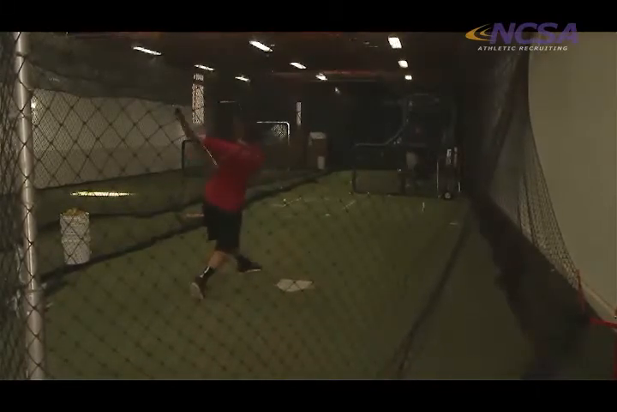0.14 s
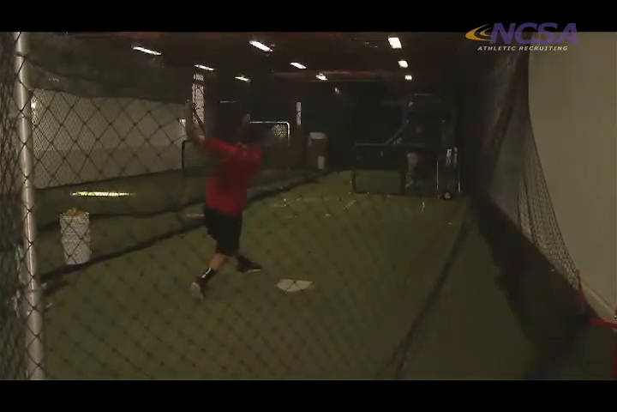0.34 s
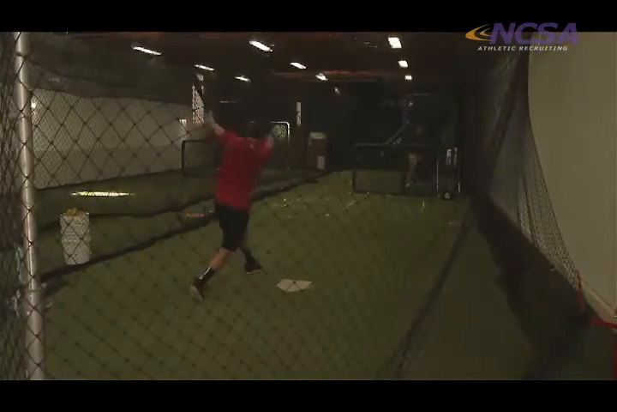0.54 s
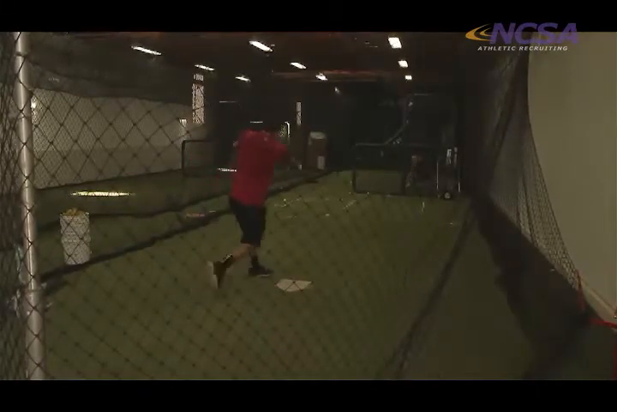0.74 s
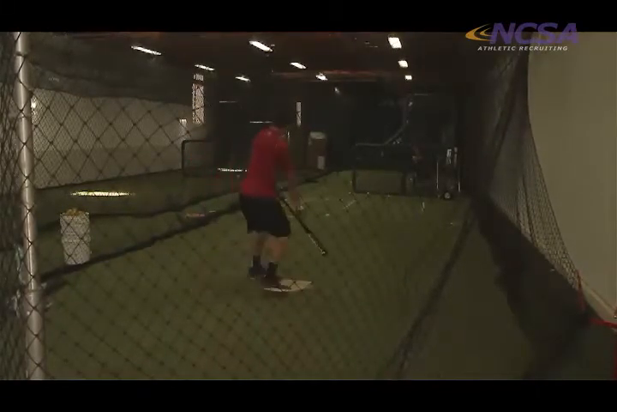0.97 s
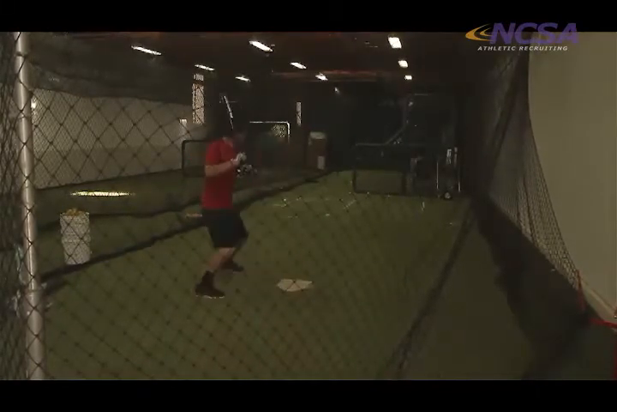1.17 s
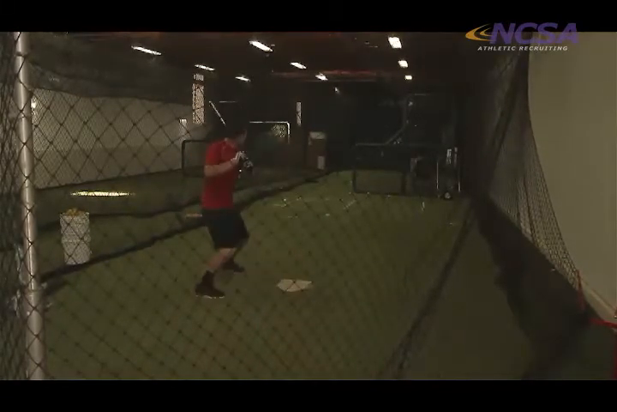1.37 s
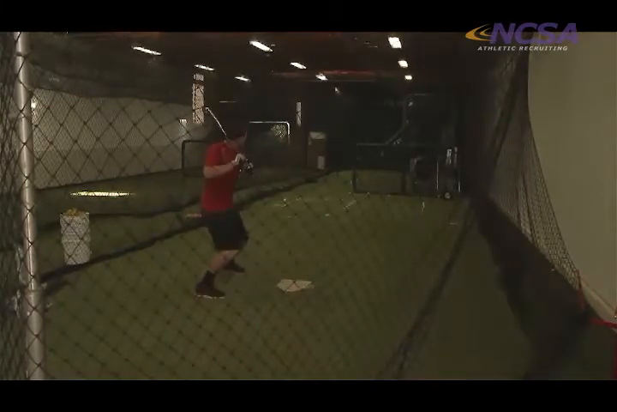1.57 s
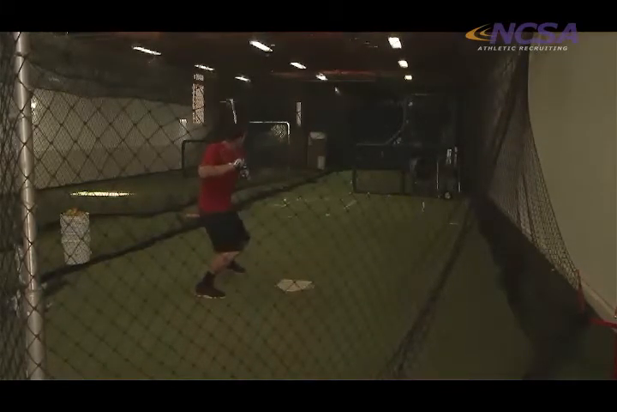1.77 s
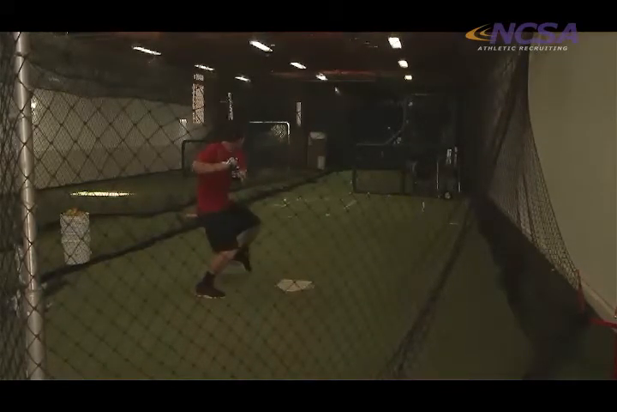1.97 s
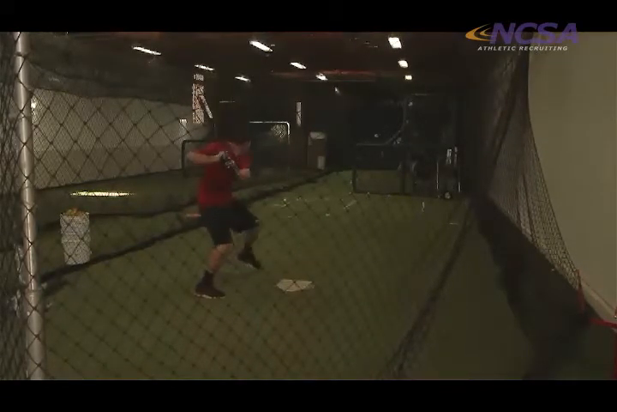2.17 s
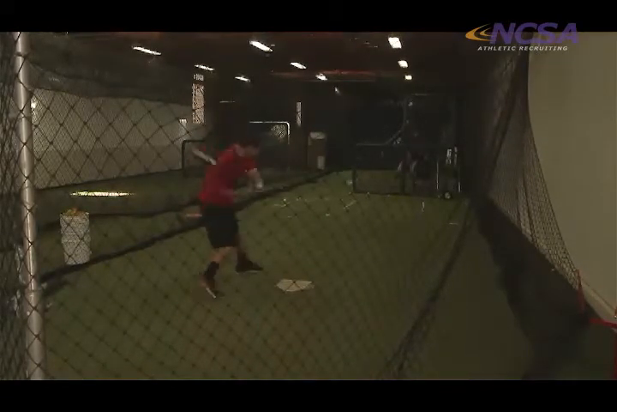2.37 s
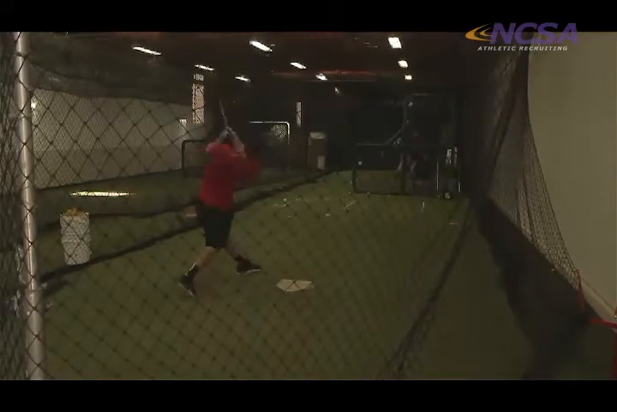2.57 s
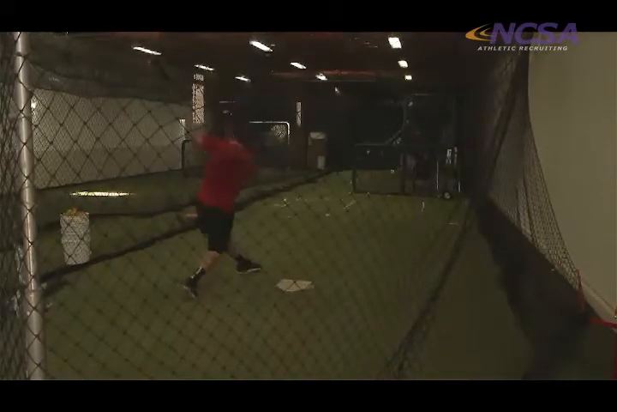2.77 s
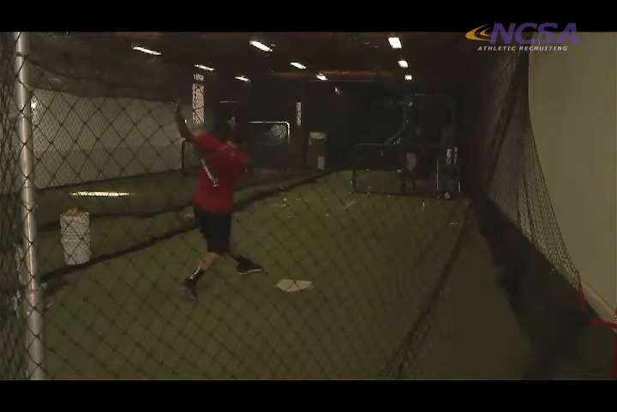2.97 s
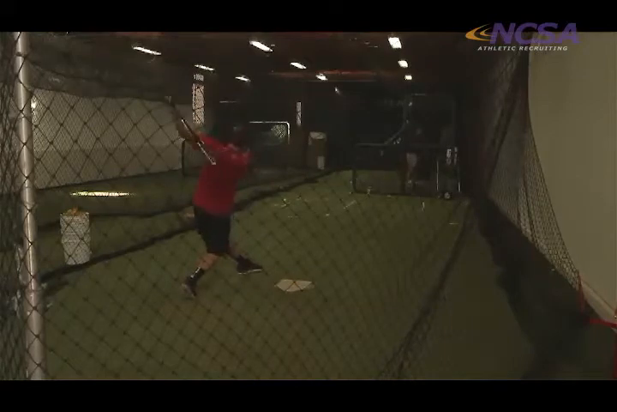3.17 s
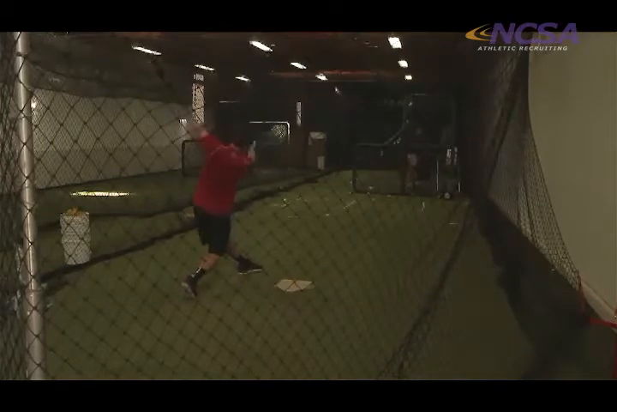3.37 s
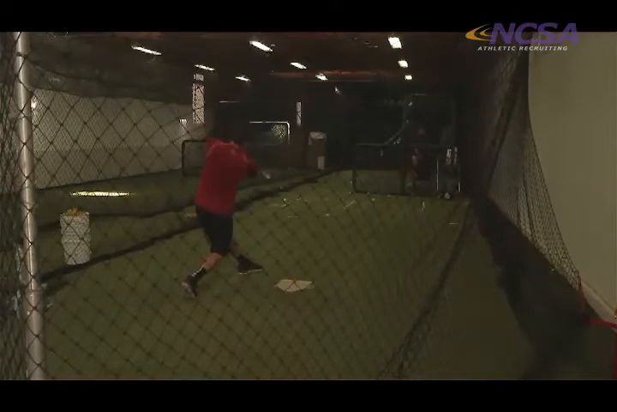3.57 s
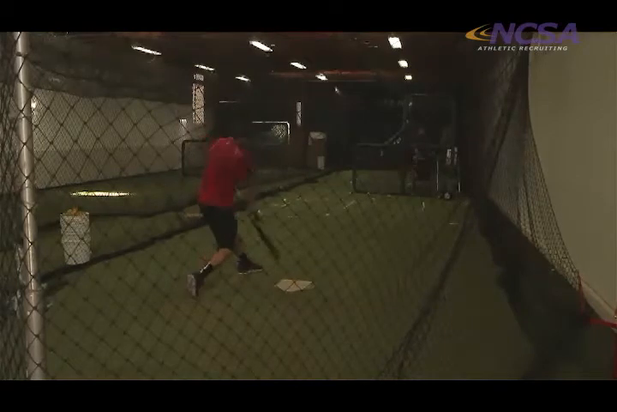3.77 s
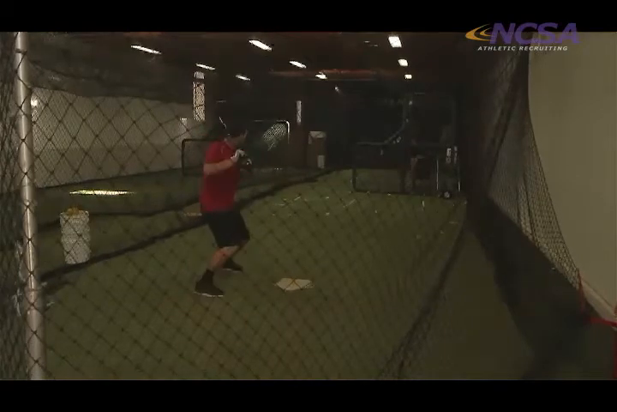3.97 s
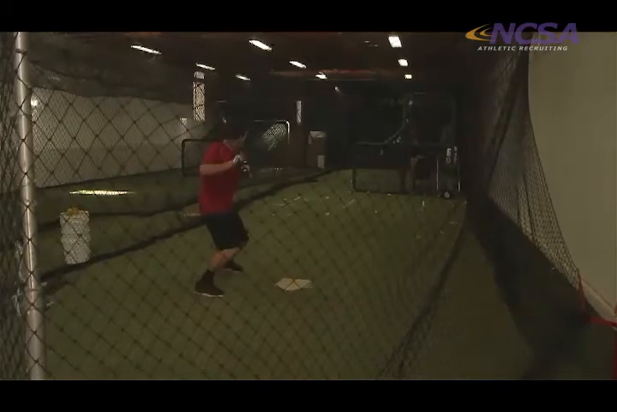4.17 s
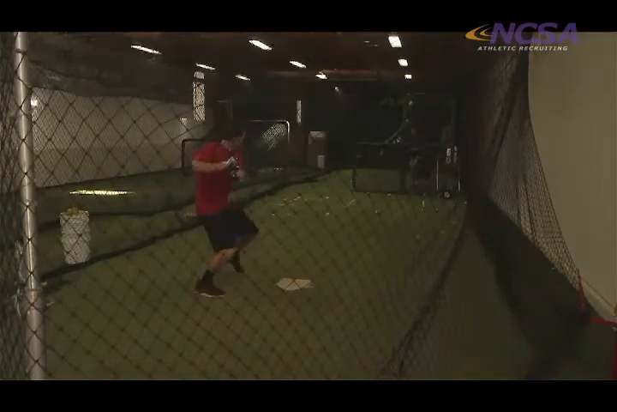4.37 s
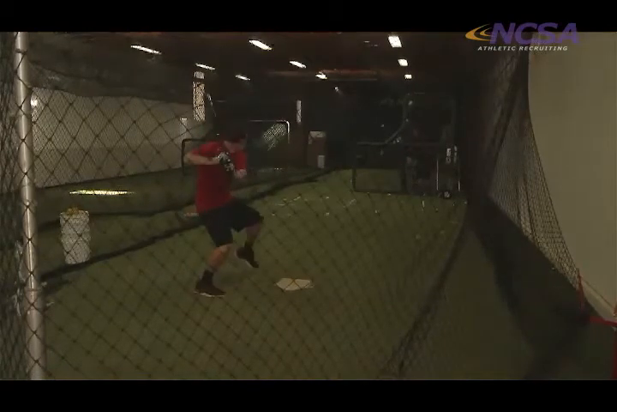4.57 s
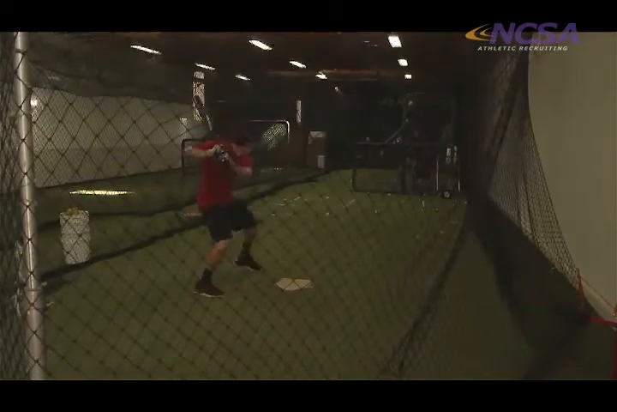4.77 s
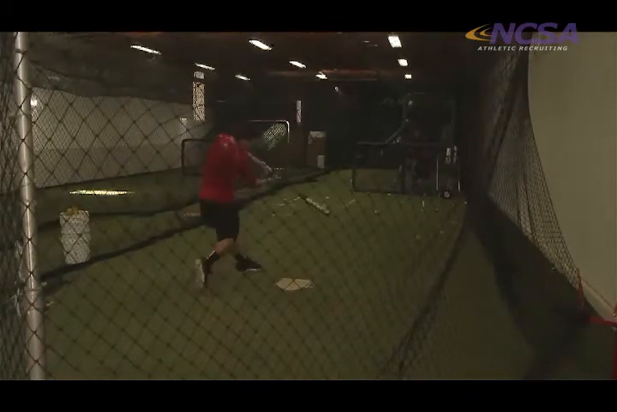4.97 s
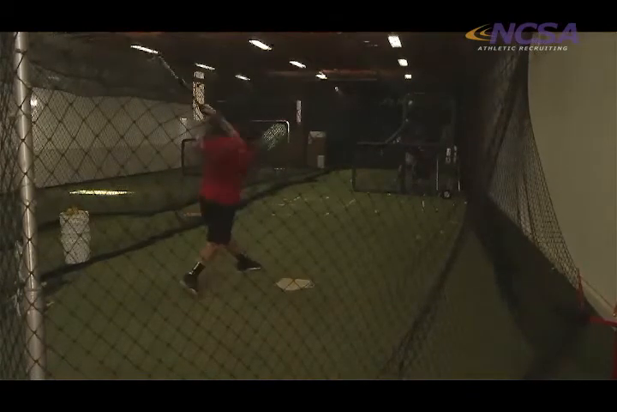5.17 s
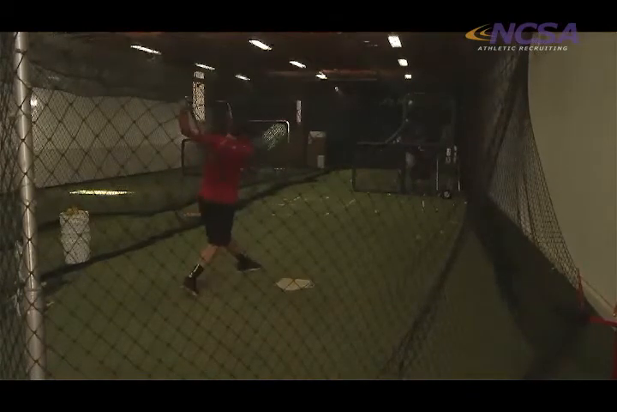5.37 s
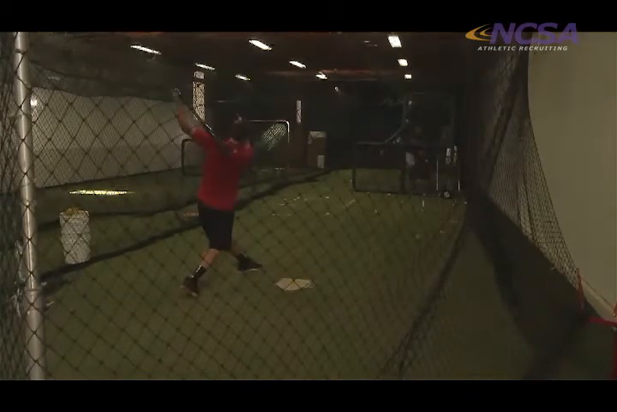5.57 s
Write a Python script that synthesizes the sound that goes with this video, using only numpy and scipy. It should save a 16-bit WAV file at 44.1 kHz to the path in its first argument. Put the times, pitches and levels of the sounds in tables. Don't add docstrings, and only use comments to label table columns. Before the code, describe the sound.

In a long, hard indoor batting cage, the fluttering ring of an earlier hit fades and a ball slams the backstop. After a cut and faint scuffs, a metal bat swishes and cracks a ball, overloading a nearby camcorder microphone. Echoes bounce between end walls amid net rattles and thuds. Another cut brings a second loud ping, cut off while ringing. Ventilation, motor hum and hiss continue, dipping after blows.

```python
import sys
import numpy as np
from scipy import signal
from scipy.fft import rfft, irfft
from scipy.io import wavfile
from scipy.ndimage import uniform_filter1d

SR = 44100
rng = np.random.default_rng(int(sys.argv[2]) if len(sys.argv) > 2 else 0)


def undo_db(level):
    steps = np.asarray(level, float) / 20
    return 10 ** steps


def materialize(psi):
    bounded = np.clip(np.atleast_2d(psi).T, -1, 1)
    quanta = np.round(bounded * 32767).astype(np.int16)
    wavfile.write(sys.argv[1], SR, quanta)


N = 248724
T = np.arange(N) / SR

BLOW_S = [2.5102, 5.0172]
RING_START_S = [-.2125, 2.5102, 5.0172]
SHOT_END_S = [1.2245, 3.8937, 5.64]
# frequency in Hz, density in dB per Hz.
CRACK = [(180, -58), (300, -32.5), (422, -13.5), (1030, 1), (1980, -1), (2670, 9), (3650, -1),
         (4240, -39.5), (5540, -41), (8530, -28), (10500, -47), (13600, -82.5), (22000, -120)]
# frequency in Hz, density in dB per Hz.
VENTILATION = [(12, -60), (20, -4), (92, -8), (130, -8.5), (266, -12), (376, -18), (403, -15), (532, -18.5),
               (806, -14.5), (1280, -20.5), (2330, -32), (2810, -31), (5000, -44.5), (6500, -66.5),
               (11000, -120)]
# frequency in Hz, density in dB per Hz.
HISS = [(1000, -12.5), (4000, 0), (8000, -2), (10500, -3)]


def unit(x):
    return x / np.sqrt(np.mean(x ** 2))


def colour(x, points):
    hz, db = np.transpose(points)
    bins_hz = np.arange(len(x) // 2 + 1) * SR / len(x)
    curve_db = np.interp(np.log(bins_hz + 1), np.log(hz), db)
    return irfft(rfft(x) * undo_db(curve_db), len(x))


def mode(x, hz, width):
    return signal.lfilter(*signal.iirpeak(hz, hz / max(width, 3.), fs=SR), x)


def walk(rate):
    k = int(SR / rate)
    held = np.repeat(rng.standard_normal(N // k + 1), k)
    return 0.98 * uniform_filter1d(held, k)[:N]


def add(out, s, x):
    i = int(s * SR)
    out[i:i + len(x)] += x[:len(out) - i]


def since(s):
    return np.clip(T - s, 0, None)


def blows():
    # strength in dB, crack in dB, floor bounce delay in seconds, bounce in dB, gain pull-down in dB.
    strikes = [
        (10, -0.5, .0053, -0.5, -10.5),
        (10, -1.5, .0045, -14.5, -17.5),
    ]
    # frequency in Hz, level in dB, T60 in seconds.
    pings = [
        [(2448, -3.5, 0.027), (2600, -23, 0.027), (2757, -2.5, 0.018), (2415, -25.5, 0.033),
         (3330, -21.5, 0.11)],
        [(2348, -0.5, 0.085), (2848, -1.5, 0.039), (2556, -1.5, 0.012), (3537, -13, 0.27), (2190, -15.5, 0.033)],
    ]
    contact_s, pull_down_s = 0.0005, 0.0068
    out, t = np.zeros(N), T[:SR // 5]
    push = np.sin(np.pi * np.clip(t / contact_s, 0, 1))
    late = np.clip(t - contact_s, 0, 1)
    for s, tones, (db, crack_db, bounce_s, bounce_db, pull_db) in zip(BLOW_S, pings, strikes):
        ring = 0
        for hz, tone_db, t60 in tones:
            ring = ring - undo_db(tone_db) * np.sin(2 * np.pi * hz * late) * 1000 ** (-late / t60)
        noise = rng.standard_normal(len(t))
        crack = mode(mode(noise, 1300, 2500), 1300, 5000) * np.exp(-t / 0.0055)
        crack += undo_db(-17) * mode(noise, 6500, 5000) * np.exp(-t / 0.0026)
        ping = push + undo_db(crack_db) * crack + ring
        add(ping, bounce_s, undo_db(bounce_db) * ping[:-int(bounce_s * SR)])
        pull = np.clip((t - pull_down_s) / 0.0007, 0, 1)
        add(out, s, undo_db(db + pull_db * pull) * ping)
    return out


def echo(hz, other_hz, crack_db, smear_s, width_hz):
    t = T[:SR // 12]
    burst = rng.standard_normal(len(t)) * np.exp(-t / smear_s)
    tone = 0
    for f, share in ((hz, 1), (other_hz, 0.6), (3020, 0.45)):
        tone = tone + share * mode(mode(mode(burst, f, 110.), f, 600.), f, 900.)
    front = burst * np.exp(-t / 0.004) + 6 * (t == t[8])
    crack = mode(np.roll(colour(np.roll(front, 100), CRACK), -100), 1300, width_hz)
    sound = tone / np.abs(tone).max() + undo_db(crack_db) * crack / np.abs(crack).max()
    sound = sound * np.clip(t / 0.0002, 0, 1)
    sound = sound * np.clip((t[-1] - t) / 0.03 - 0.3, 0, 1)
    return sound / np.abs(sound).max()


def absorb(x, start_s):
    loss_db_per_s = 33.5
    hz, s, frames = signal.stft(x, SR, nperseg=256)
    loss_db = loss_db_per_s * (hz[:, None] / 8000) ** 2 * np.clip(s - start_s, 0, 1)
    return signal.istft(frames * undo_db(-loss_db), SR, nperseg=256)[1][:N]


def hall():
    # frequency in Hz, width in Hz, level in dB in swings one, two and three.
    barrel_modes = [(2360, 86, -25, 4, -22), (2344, 10, -12, 2, 15), (2395, 22, -5, 5, -2),
                    (2605, 14, -4, 11, -14), (2860, 5.7, -2, -23.5, 10.5), (3090, 7, -17.5, -14, -18.5),
                    (3030, 28, -4.5, -2.5, 9), (3280, 63, -19, -11, -33), (3750, 39, -11, -44.5, 3),
                    (3420, 86, -25.5, -2, -14), (3640, 29, -14, -8, -20), (3840, 110, -19, -15, -3),
                    (3860, 63, -12, -16.5, 1.5), (3537, 120, -4.5, -12.5, 4)]
    # level in dB, crack against the barrel tones in dB.
    rings = [
        (-31.5, -1),
        (-33, -1),
        (-31, -1.5),
    ]
    sheens_db = [-13, -13.5, -16]
    # delay in seconds, peak in dB.
    flutter = [(.1025, -9.5), (0.1816, -14.5), (0.262, -15), (0.3351, -17.5), (0.4036, -14.5)]
    flutter_trim_db = [-1.5, -1, 0.5]
    snaps_db = [-34, -60]
    loud_tones_hz = [(2600, 3600), (2605, 2395), (2780, 3560)]
    # delay in seconds, peak in dB, smear in seconds.
    clumps = [(.014, -10.5, 0.0058), (.033, -15, 0.023), (.053, -21, 0.0081), (.116, -15, 0.0088),
              (.152, -19.5, 0.019), (.194, -50, 0.0029), (.288, -43, 0.0077), (.312, -18.5, 0.0024),
              (.344, -26, 0.0036), (.438, -26, 0.01), (.453, -18, 0.023), (.48, -21, 0.0063),
              (.52, -31, 0.0033), (.584, -25, 0.0081)]
    # time in seconds, peak in dB, Hz, smear in seconds.
    strays = [
        [(.0478, -13.5, 2600, 0.0032), (.1314, -27, 3340, 0.0054), (.2418, -21, 2730, 0.0042),
         (.3386, -24, 2680, 0.0039)],
        [(2.5555, -8.5, 2430, 0.0034), (2.7666, -23.5, 3000, 0.0082)],
        [(5.0324, -19, 2910, 0.0066), (5.0494, -17, 2880, 0.041), (5.0694, -13, 3590, 0.01),
         (5.0844, -21.5, 3350, 0.0089), (5.2114, -16, 3550, 0.007)],
    ]
    build_s, hold_s, swell_db_s, fall_db_s = 0.0051, 0.47, 7, 46.5
    sheen_curve = [(3300, -30), (4050, 7), (5000, 4.5), (6500, -3.5), (10500, -15.5)]
    wall_limit = signal.cheby1(6, 1, 3960, fs=SR, output="sos")
    out = np.zeros(N)
    for swing, ((db, crack_db), start_s, end_s) in enumerate(zip(rings, RING_START_S, SHOT_END_S)):
        arrivals = rng.standard_normal(N) * undo_db(1.5 * walk(150))
        barrel = unit(sum(undo_db(row[2 + swing]) * mode(arrivals, row[0], row[1]) for row in barrel_modes))
        barrel = signal.sosfilt(wall_limit, barrel)
        sheen = undo_db(sheens_db[swing]) * unit(colour(arrivals, sheen_curve))
        crack = undo_db(crack_db) * unit(colour(arrivals, CRACK))
        fall_db = fall_db_s * since(start_s + hold_s) - swell_db_s * since(start_s)
        shape = (1 - np.exp(-since(start_s) / build_s)) * undo_db(db - fall_db) * (T < end_s)
        heard = shape * (barrel + sheen + crack)

        tones = loud_tones_hz[swing]
        returns = []  # time, peak dB, then what echo() takes
        for k, (s, peak_db) in enumerate(flutter):
            pair = tones[k % 2], tones[1 - k % 2]
            returns.append((start_s + s, peak_db + flutter_trim_db[swing], *pair, 2, 0.004, 9000.))
        for k, (s, peak_db, smear_s) in enumerate(clumps):
            pair = tones[k % 2], tones[1 - k % 2]
            returns.append((start_s + s, peak_db, *pair, -5, smear_s, 4000.))
        for s, peak_db, hz, smear_s in strays[swing]:
            returns.append((s, peak_db, hz, tones[0], -3, smear_s, 6000.))
        for s, peak_db, *look in returns:
            if 0 <= s < end_s:
                add(heard, s, undo_db(peak_db + 2) * echo(*look))

        for (delay_s, _), snap_db in zip(flutter, snaps_db):
            s = start_s + delay_s
            heard += (T >= s) * undo_db(snap_db) * np.exp(-since(s) / 0.0032) * mode(arrivals, 5600, 7000)
        out += absorb(heard, start_s)
    return out


def thuds():
    # start in seconds, peak in dB, body in Hz, knock in Hz, knock against body in dB.
    soft_blows = [(0.041, -31.5, 297, 960, -21), (0.241, -37, 107, 677, 9.5), (0.834, -31.5, 104, 437, -28),
                  (2.254, -27.5, 206, 400, -1), (2.762, -31, 185, 914, 1), (2.82, -33, 183, 570, 8.5),
                  (2.998, -32.5, 210, 877, 5.5), (3.153, -17, 221, 364, -1), (3.623, -29, 135, 363, -4),
                  (4.357, -35, 214, 755, -13), (4.805, -29, 185, 473, -2), (4.977, -20.5, 201, 447, -14),
                  (5.445, -27, 186, 890, 0.5)]
    slams = [
        (.7676, -9, 275, 1400, -10),
        (.803, -21, 250, 430, -18),
        (5.2585, -19, 175, 900, 1),
    ]
    events = [(*row, 5.77) for row in soft_blows] + [(*row, 5.76) for row in slams]
    out, t = np.zeros(N), T[:SR]
    rise = (1 - np.exp(-t / 0.0011)) ** 2
    for s, db, hz, knock_hz, knock_db, cycles in events:
        t60 = cycles / hz
        body = -np.sin(2 * np.pi * hz * t) * 1000 ** (-t / t60)
        sag_hz = hz + (knock_hz - hz) * np.exp(-t / 0.013)
        knock = -np.sin(2 * np.pi * np.cumsum(sag_hz) / SR) * 1000 ** (-1.2 * t / t60)
        tick = mode(mode(rng.standard_normal(SR), 1200, 1200), 1200, 1800) * np.exp(-t / 0.0021)
        tail = unit(mode(mode(rng.standard_normal(SR), 0.94 * hz, 0.2 * hz), hz, 3 * hz))
        tail *= (1 - np.exp(-t / 0.011)) * 1000 ** (-t / 0.48)
        thud = body + undo_db(knock_db) * (knock + tick) + undo_db(-22.5) * tail
        add(out, s, undo_db(db + 4.5) * rise * thud)
    return out


def netting():
    # start in seconds, rumble in dB, rustle in dB.
    shakes = [
        (.042, -36.5, -55),
        (2.765, -39, -56),
        (5.256, -43.5, -53.5),
    ]
    # start in seconds, peak in dB.
    clicks = [(0.0994, -31), (0.1183, -23.5), (2.823, -31), (2.9774, -36.5), (5.14, -30.5), (5.2244, -46)]
    rumble_t60_s, rustle_t60_s, snap_db, snap_s = 1.4, 0.4, 13.5, 0.0037
    rumble = unit(mode(unit(colour(rng.standard_normal(N), VENTILATION)), 350, 500))
    rustle = unit(colour(rng.standard_normal(N), HISS))
    out = np.zeros(N)
    for s, db in clicks:
        out += (T >= s) * undo_db(db - 10) * np.exp(-since(s) / 0.002) * rustle
    for s, low_db, high_db in shakes:
        low = undo_db(low_db) * rumble * 1000 ** (-since(s) / rumble_t60_s)
        fade = 1000 ** (-since(s) / rustle_t60_s) + undo_db(snap_db) * np.exp(-since(s) / snap_s)
        high = undo_db(high_db + 2 * walk(60)) * rustle * fade
        out += (T >= s) * (low + high)
    return out


def swishes():
    # lead before the blow in seconds, level in dB, starting Hz, final Hz.
    swings = [
        (0.121, -34, 480, 205.5),
        (0.124, -35, 418, 470.4),
    ]
    rush_curve = [(150, 3.5), (500, 0.5), (1200, -2), (3500, -14), (4300, -41.5), (10000, -62.5)]
    cloth_curve = [(300, -3), (1500, -3), (3600, -6.5), (4500, -18), (10000, -47)]
    out = np.zeros(N)
    for (lead_s, swish_db, hz0, hz1), blow_s in zip(swings, BLOW_S):
        away_s = np.abs(blow_s - T)
        db = swish_db + 13 * np.exp(-away_s / 0.016)
        hz = np.interp(T, [blow_s - lead_s, blow_s], [hz0, hz1])
        flow = unit(mode(mode(rng.standard_normal(N), 80, 170), 80, 400))
        eddies = np.real(signal.hilbert(flow) * np.exp(2j * np.pi * np.cumsum(0.7 * hz) / SR))
        rush = unit(colour(rng.standard_normal(N), rush_curve))
        cloth = unit(colour(rng.standard_normal(N), cloth_curve))
        out += (T < blow_s) * undo_db(-44.5) * np.exp(-away_s / 0.2) * cloth
        rise = np.clip(since(blow_s - lead_s) / 0.042, 0, 1)
        out += rise * (T < blow_s) * undo_db(db) * (0.6 * eddies + 0.7 * rush)
    return out


def footwork():
    # start in seconds, loudest in seconds, end in seconds, level in dB.
    scuffs = [
        (1.03, 1.16, 1.236, -49),
        (1.86, 2.044, 2.13, -55.5),
    ]
    # start in seconds, length in seconds, starting Hz, final Hz, blur in Hz, level in dB.
    squeaks = [
        (4.903, .052, 455, 430, 15, -34),
        (1.095, .125, 2980, 3280, 130, -54),
    ]
    scuff_curve = [(400, -12), (1500, -2.5), (3300, 2.5), (4500, -13.5), (10000, -43)]
    out = np.zeros(N)
    for start_s, loudest_s, end_s, top_db in scuffs:
        db = top_db - 11.5 * np.interp(T, [start_s, loudest_s, end_s], [1, 0, 1])
        on = (T >= start_s) & (T < end_s)
        out += on * undo_db(db + 2 * walk(110)) * unit(colour(rng.standard_normal(N), scuff_curve))
    for s, length, hz0, hz1, blur_hz, db in squeaks:
        t = T[:int(length * SR)]
        jitter = unit(signal.lfilter(*signal.butter(2, blur_hz, fs=SR), rng.standard_normal(SR)))
        slip = 1 + jitter[-len(t):] * blur_hz / 100
        turn = 2 * np.pi * np.cumsum(hz0 + (hz1 - hz0) * t / length) / SR
        add(out, s, undo_db(db) * np.sin(np.pi * t / length) ** 0.5 * slip * np.sin(turn))
    return out


def gain_db():
    # time in seconds, dip in dB, release in seconds.
    dips = [
        (1.2225, 3.5, 1),
        (3.8937, 10, 0.24),
    ]
    duck_db, attack_s, duck_release_s = 21, 0.056, 0.38
    down_db = np.zeros(N)
    for s, end_s in zip(RING_START_S, SHOT_END_S):
        dive = 1 - np.exp(-since(s) / attack_s)
        down_db += duck_db * dive * np.exp(-since(s) / duck_release_s) * (T < end_s)
    for s, db, release_s in dips:
        down_db += db * (T >= s) * np.exp(-since(s) / release_s)
    return -down_db


def background():
    # start in seconds, length in seconds, frequency in Hz, level in dB.
    motor_runs = [(0.065, 1.09, 93.5, -38.5), (1.453, 0.3, 87.8, -41), (1.86, 0.1, 85.6, -44),
                  (2.076, 0.27, 90, -46.5), (2.85, .92, 87, -45), (3.796, 0.087, 93, -45),
                  (3.968, 0.42, 65, -45.5), (4.497, .08, 94, -48), (4.78, 0.07, 97, -44.5)]
    low, high = (colour(rng.standard_normal(N), VENTILATION) for _ in range(2))
    split = signal.butter(1, 500, fs=SR)
    air = undo_db(1.5 * walk(8)) * signal.lfilter(*split, low)
    air += undo_db(0.7 * walk(4)) * (high - signal.lfilter(*split, high))
    hum = 0
    wander, flicker_db = 1 + 0.005 * walk(2.1), walk(7.2)
    for s, length, hz, run_db in motor_runs:
        on = uniform_filter1d(1. * ((T >= s) & (T < s + length)), 900)
        turn = 2 * np.pi * np.cumsum(hz * wander) / SR
        tone = np.sin(turn) + 0.3 * np.sin(2 * turn) + 0.17 * np.sin(3 * turn)
        hum += on * undo_db(run_db + flicker_db + 1) * tone
    hiss = undo_db(-61) * unit(colour(rng.standard_normal(N), HISS))
    return undo_db(gain_db()) * (undo_db(-43.5) * unit(air) + hum + hiss)


def scene():
    return (blows() + hall() + thuds() + netting() + swishes() + footwork() + background())[None]


def low_pass(x):
    return signal.sosfilt(signal.butter(12, 11210, fs=SR, output="sos"), x)


def record(dry):
    # seconds after a blow, level in dB.
    ceiling = [(0, 0), (.0068, 0), (.009, -3.2), (.02, -3.6), (.035, 0)]
    change_s, offset_db, offset_decay_s = 3.8937, -26, 0.044
    x = signal.sosfilt(signal.butter(2, 54.6, "high", fs=SR, output="sos"), dry)
    after_s, db = np.transpose(ceiling)
    top = 0.425 * undo_db(sum(np.interp(T - s, after_s, db) for s in BLOW_S))
    x = x / (1 + np.abs(x / top) ** 3) ** (1 / 3)
    x = x + undo_db(offset_db) * (T >= change_s) * np.exp(-np.abs(T - change_s) / offset_decay_s)
    x = signal.filtfilt(signal.firwin(65, 10500, window=("kaiser", 2.2), fs=SR), 1, x)
    return low_pass(x)


dry = scene()
out = record(dry)
materialize(out)
```